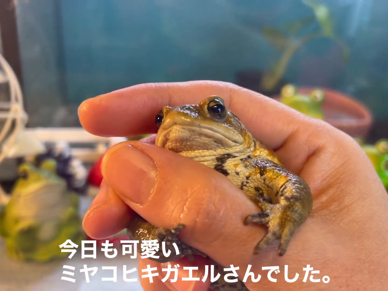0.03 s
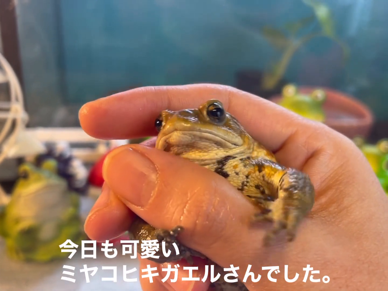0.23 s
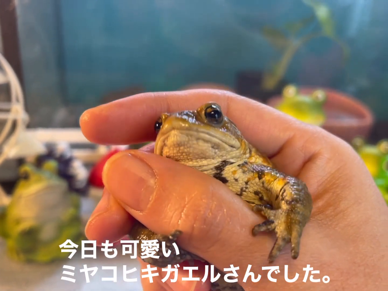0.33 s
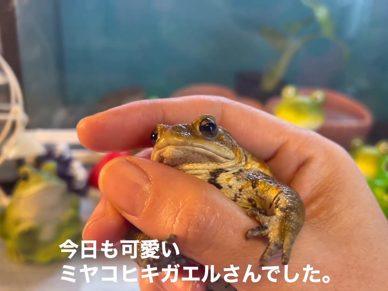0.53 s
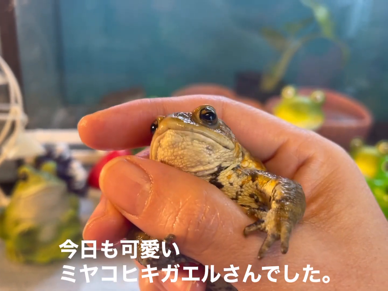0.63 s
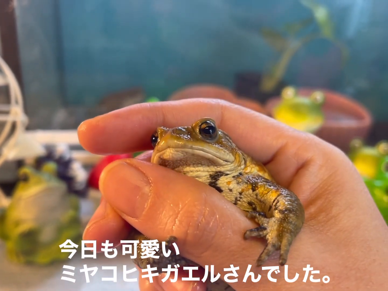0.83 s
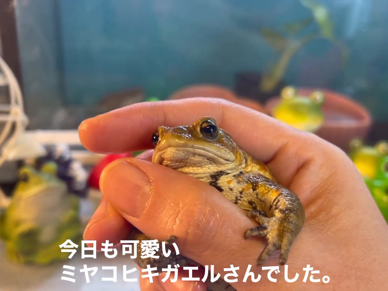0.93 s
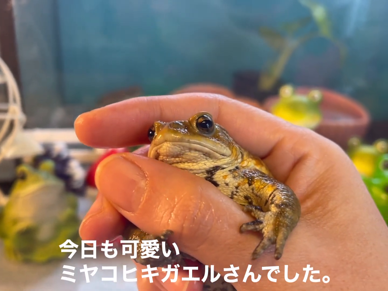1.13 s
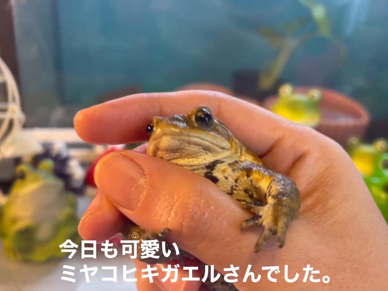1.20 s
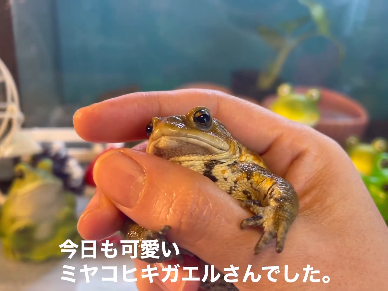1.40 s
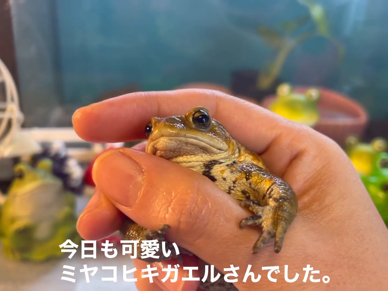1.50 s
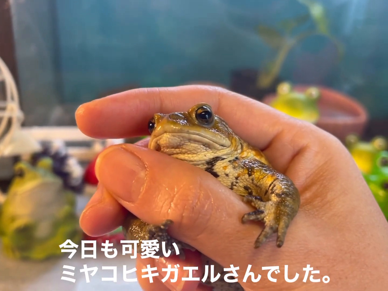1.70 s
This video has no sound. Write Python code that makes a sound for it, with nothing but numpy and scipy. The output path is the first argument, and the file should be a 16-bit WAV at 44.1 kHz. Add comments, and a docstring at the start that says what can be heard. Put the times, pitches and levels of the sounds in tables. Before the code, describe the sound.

Three brief, squeaky toad chirps, each falling in pitch, over faint room hum.

```python
"""A toad held in a hand gives three short release chirps, close up in a small room.
Room rumble, a low hum and a thin high whine run throughout; a soft hiss is gone by 0.5 s.
At 0.25, 0.58 and 1.2 s the larynx pops a few times, then locks into a falling tone,
raspy at first, pure at the end. Faint wet ticks come before and after the first chirp
and once after the last."""
import sys
import numpy as np
from scipy import signal
from scipy.fft import rfft, irfft, next_fast_len
from scipy.io import wavfile
from scipy.ndimage import map_coordinates

SR = 44100
rng = np.random.default_rng(int(sys.argv[2]) if len(sys.argv) > 2 else 0)


def digitize_waveform(pressure):
    """Quantize a signal to 16-bit integers and store it at the path in sys.argv[1].

    Rows of a 2-D input are taken as channels; values are limited to [-1, 1].
    """
    field = np.atleast_2d(pressure).T
    bounded = np.clip(field, -1, 1)
    quanta = np.round(bounded * 32767).astype(np.int16)
    wavfile.write(sys.argv[1], SR, quanta)


N = 77175


def amp(db):
    return 10 ** (np.asarray(db) / 20)


def unit(x):
    return x / np.sqrt(np.mean(x ** 2) + 1e-20)


def along(points, hz):
    """Interpolate (frequency [Hz], value) points on a log axis."""
    freqs, values = np.transpose(points)
    return np.interp(np.log(hz + 1), np.log(freqs + 1), values)


def ramp(u):
    """Smooth step, 0 to 1."""
    return np.sin(np.pi / 2 * np.clip(u, 0, 1)) ** 2


def wobble(rate_hz, t):
    """Smooth random curve, rate_hz knots a second."""
    return map_coordinates(rng.standard_normal(4096), [t * rate_hz], mode="wrap")


def filtered(x, response):
    """Apply the gain response(hz)."""
    size = next_fast_len(N + SR // 2)
    return irfft(rfft(x, size) * response(np.fft.rfftfreq(size, 1 / SR)), size)[..., :N]


def noise(colour):
    """Coloured noise, rms 1."""
    return unit(filtered(rng.standard_normal(N), lambda hz: amp(along(colour, hz))))


def placed(x, balance):
    """Pan by a left-right level difference per frequency."""
    return filtered(x, lambda hz: amp(np.outer([.5, -.5], along(balance, hz))))


def add(track, start_s, sound):
    part = track[round(start_s * SR):][:len(sound)]
    part += sound[:len(part)]


# calls (start [s], length [s], start pitch [Hz], level [dB], overtones [dB], rasp [dB],
# rasp hold [s], roughness [0-1])
CHIRPS = [(0.247, 0.043, 1310, -19, -13.5, -18.5, 0.012, 0.31),
          (0.583, 0.045, 1389, -21, -15, -17, 0.012, 0.63),
          (1.2077, 0.04, 1160, -24.5, -16, -19, 0.0098, .15)]
# throat shaping of the overtones (frequency [Hz], gain [dB])
THROAT_COLOUR = [(1800, 8.5), (2150, 0.5), (2450, 0.5), (3000, -0.5), (3300, -17.5), (3650, -6),
                 (4000, -34), (5500, -60)]
# noise between the overtones of rough calls (frequency [Hz], gain [dB])
GRIT_COLOUR = [(500, -24), (900, 3.5), (1600, -0.5), (2900, -2), (3700, -15), (4400, -18), (6500, -33.5)]
# bright rasp, also the snap of the pops (frequency [Hz], gain [dB])
RASP_COLOUR = [(2500, -23.5), (3900, -21), (4450, -7), (5000, -22), (5700, -9.5), (6600, -9), (7100, -18.5),
               (7800, -9), (8500, -16), (9700, -5), (11200, 8), (11900, -5), (12500, 0.5), (13300, -24.5)]
END_HZ, GLIDE_POWER = 966.6, 1.85
ATTACK_S, RELEASE_S, ROUGH_S = 0.0032, 0.0063, 0.016
FADE_DB, FADE_POWER, OVERTONE_FADE_DB, RASP_FALL_DB_PER_S = 12.5, 1.77, 23.5, 997.5
THROB_HZ, THROB_DEPTH = 365.4, 0.69
FLUTTER_HZ, FLUTTER_DB, JITTER = 1100, 1.2, .08
FLICKER_HZ, FLICKER_DB, GRIT_DB = 120, 3, -11


def chirps():
    """Larynx tone: pitch sags as the air runs out; overtones and rasp die before the fundamental."""
    out = np.zeros(N)
    harmonics = np.arange(2, 15)[:, None]
    for start_s, length_s, start_hz, db, overtone_db, rasp_db, hold_s, roughness in CHIRPS:
        t = np.arange(int(length_s * SR)) / SR
        progress = t / length_s
        unrest = roughness * np.exp(-(t / ROUGH_S) ** 2)
        pitch_hz = END_HZ + (start_hz - END_HZ) * (1 - progress) ** GLIDE_POWER
        jitter = 1 + JITTER * unrest * wobble(FLUTTER_HZ, t)
        phase = 2 * np.pi * np.cumsum(pitch_hz * jitter) / SR
        tone = amp(-FADE_DB * progress ** FADE_POWER) * np.sin(phase)

        partials = np.cos(harmonics * phase + rng.uniform(0, 2 * np.pi, harmonics.shape))
        flicker_db = FLICKER_DB * np.array([wobble(FLICKER_HZ, t) for _ in harmonics])
        throat_gain = amp(along(THROAT_COLOUR, harmonics * pitch_hz) + flicker_db)
        overtones = amp(overtone_db - OVERTONE_FADE_DB * progress) * (throat_gain * partials).sum(0)

        opening = 1 + .5 * np.cos(phase)
        grit = amp(GRIT_DB) * unrest * opening * noise(GRIT_COLOUR)[:len(t)]
        air = (.3 + roughness) * opening * noise(RASP_COLOUR)[:len(t)]
        buzz = (amp(along(RASP_COLOUR, harmonics * pitch_hz)) * partials).sum(0)
        fall_db = RASP_FALL_DB_PER_S * np.maximum(t - hold_s, 0)
        rasp = amp(rasp_db - fall_db + FLUTTER_DB * wobble(FLUTTER_HZ, t)) * (buzz + air)

        gate = ramp(t / ATTACK_S) * ramp((length_s - t) / RELEASE_S)
        # the beat of the pops lingers in the tone
        beat = np.cos(2 * np.pi * THROB_HZ * t + .5 * wobble(THROB_HZ, t))
        throb = 1 + THROB_DEPTH * unrest * beat
        add(out, start_s, amp(db) * gate * throb * (tone + overtones + grit + rasp))
    return out


# larynx openings (time [s], level [dB], brightness [dB], snap [dB])
POPS = [(0.2429, -18, 1, -32), (0.2434, -23, -10, -36), (.2462, -20.5, -6, -25), (0.2488, -12.5, -2.5, -27),
        (0.5775, -25, 0.5, -35), (0.5784, -17.5, -6, -29.5), (0.5809, -13.5, -2, -17),
        (0.5838, -22, 10, -16.5), (1.2051, -25, -3.5, -18), (1.2059, -22.5, -14, -17),
        (1.209, -20.5, -2, -19)]
# throat resonances (frequency [Hz], level [dB], T60 [s])
THROAT_MODES = [(907, -12.5, 0.0079), (1384, -7, 0.012), (1615, -6.5, .008), (2680, -14, 0.011)]
# treble tilt (frequency [Hz], share of brightness [0-1])
POP_TILT = [(1500, 0), (2600, 1)]
POP_ATTACK_S, POP_DETUNE, SNAP_T60_S = 0.00044, .02, 0.011
PUSH_DB, PUSH_S = -17.5, 0.00019


def pops():
    """As a chirp starts, each opening of the larynx rings the throat once."""
    out, t = np.zeros(N), np.arange(SR // 20) / SR
    for start_s, db, bright_db, snap_db in POPS:
        ring = np.zeros(len(t))
        for hz, mode_db, t60_s in THROAT_MODES:
            envelope = amp(mode_db + bright_db * along(POP_TILT, hz) - 60 * t / t60_s)
            ring += envelope * np.sin(2 * np.pi * hz * rng.normal(1, POP_DETUNE) * t)
        snap = amp(snap_db - 60 * t / SNAP_T60_S) * noise(RASP_COLOUR)[:len(t)]
        push = amp(PUSH_DB) * t / PUSH_S * np.exp(1 - t / PUSH_S)
        add(out, start_s, amp(db) * ramp(t / POP_ATTACK_S) * (push - ring + snap))
    return out


# wet ticks (time [s], level [dB])
TICKS = [(0.0993, -56.5), (0.3378, -38.5), (0.3375, -43.5), (.3487, -51), (1.393, -58)]
# tick spectrum (frequency [Hz], gain [dB])
TICK_COLOUR = [(1000, -23), (3500, -22), (5500, -9), (7500, -21), (9200, -1.5), (11000, 8.5), (12500, -23),
               (13500, -40)]
TICK_ATTACK_S, TICK_T60_S = 0.00071, .009


def ticks():
    """Wet skin or mouth: tiny bursts of bright noise."""
    out, t = np.zeros(N), np.arange(SR // 20) / SR
    for start_s, db in TICKS:
        envelope = amp(db - 60 * t / TICK_T60_S) * ramp(t / TICK_ATTACK_S)
        add(out, start_s, envelope * noise(TICK_COLOUR)[:len(t)])
    return out


# fingers scatter only short waves (frequency [Hz], gain [dB])
NEAR_COLOUR = [(1300, -14), (2500, -4), (4500, 12)]
# room decay (frequency [Hz], T60 [s])
ROOM_DECAY = [(200, 0.27), (1000, 0.14), (4000, 0.18), (11000, 0.14)]
NEAR_DB, NEAR_RISE_S, NEAR_T60_S = -6.5, 0.00049, 0.017
TAIL_DB, TAIL_RISE_S = -16, .003


def reflections(x):
    """Quick echoes off the hand and nearby things, then the short room tail."""
    hz, frame_s, spectrum = signal.stft(rng.standard_normal((2, SR // 2)), SR, nperseg=256)
    decay = amp(-60 * frame_s / along(ROOM_DECAY, hz)[:, None])
    tail = signal.istft(spectrum * decay, SR, nperseg=256)[1]
    t = np.arange(tail.shape[1]) / SR
    tail *= ramp(t / TAIL_RISE_S)
    tail += .5 * tail.mean(0)  # narrows the image
    near = noise(NEAR_COLOUR)[:len(t)] * amp(-60 * t / NEAR_T60_S) * ramp(t / NEAR_RISE_S)
    response = amp(TAIL_DB) * tail / np.linalg.norm(tail[0]) + amp(NEAR_DB) * near / np.linalg.norm(near)
    return signal.fftconvolve(x[None], response, axes=1)[:, :N]


# room noise spectrum (frequency [Hz], gain [dB])
RUMBLE_COLOUR = [(10, -58.5), (20, -33.5), (30, -11.5), (49, -1.5), (80, -14), (120, -9), (161, -17.5),
                 (195, -12), (290, -14.5), (400, -23), (650, -26), (900, -25.5), (1100, -28), (1800, -32),
                 (2850, -40), (3900, -54.5), (7000, -58), (9300, -52), (10800, -46.5), (11700, -58.5),
                 (13000, -76)]
# stereo likeness (frequency [Hz], correlation [-1 to 1])
RUMBLE_CORRELATION = [(60, 0.95), (150, 0.91), (360, 0.79), (880, -0.14), (2160, 0.17), (5280, .5),
                      (9000, 0.95)]
# room noise pan (frequency [Hz], left minus right [dB])
RUMBLE_BALANCE = [(60, 0.5), (360, 2.5), (880, 0.5), (2500, 6), (5280, 3.5), (8500, 0.5)]
RUMBLE_DB = -56


def rumble():
    """Steady room noise, narrow in the bass, wide in the midrange."""
    def mid_side_gain(hz):
        angle = np.arccos(np.clip(along(RUMBLE_CORRELATION, hz), -1, 1)) / 2
        return amp(along(RUMBLE_COLOUR, hz)) * [np.cos(angle), np.sin(angle)]

    mid, side = filtered(rng.standard_normal((2, N)), mid_side_gain)
    return amp(RUMBLE_DB) * unit(placed(np.array([mid + side, mid - side]), RUMBLE_BALANCE))


def wavering_sine(hz, waver_hz, t):
    """Sine whose pitch strays by about waver_hz."""
    return np.sin(2 * np.pi * np.cumsum(hz + waver_hz * wobble(4 * waver_hz, t)) / SR)


# hum lines (frequency [Hz], level [dB], waver [Hz])
HUM_TONES = [(64.1, -58.5, 1.926), (101.6, -68.5, 3.7), (200.6, -71, 2.4)]


def hum(t):
    """Three low, wavering tones."""
    return sum(amp(db) * unit(wavering_sine(hz, waver_hz, t)) for hz, db, waver_hz in HUM_TONES)


# whine lines (frequency [Hz], waver [Hz])
WHINE_TONES = [(9680, 45), (11220, 30)]
# per whine line (level [dB])
WHINE_LEVELS = [-84, -92]
WHINE_FLICKER_HZ, WHINE_FLICKER_DB = 60, 2


def whine(t):
    """Two thin, high tones that waver and flicker."""
    out = np.zeros(N)
    for (hz, waver_hz), db in zip(WHINE_TONES, WHINE_LEVELS):
        tone = wavering_sine(hz, waver_hz, t)
        flicker = amp(WHINE_FLICKER_DB * wobble(WHINE_FLICKER_HZ, t))
        out += amp(db) * unit(tone * flicker)
    return out


# hiss envelope (time [s], level [dB])
HISS_ENVELOPE = [(0, -67.5), (.085, -68.5), (.125, -65.5), (.23, -68), (.36, -79.5), (.5, -100)]
# hiss spectrum (frequency [Hz], gain [dB])
HISS_COLOUR = [(600, -1), (1500, 2), (3000, -4.5), (4000, -17), (5400, -13), (7000, -29), (12000, -24.5)]


def hiss(t):
    """Soft noise that dies away after the first chirp."""
    return amp(np.interp(t, *np.transpose(HISS_ENVELOPE))) * noise(HISS_COLOUR)


# toad and hiss pan (frequency [Hz], left minus right [dB])
TOAD_BALANCE = [(200, 5), (650, 6), (1190, 8.5), (2160, 7.5), (3300, 10.5), (4300, -0.5), (5600, 9),
                (7100, 0)]


def scene():
    """Toad and hiss a little to the left, over the room background."""
    t = np.arange(N) / SR
    toad = chirps() + pops() + ticks()
    toad_in_room = placed(toad + reflections(toad), TOAD_BALANCE)
    return toad_in_room + rumble() + hum(t) + whine(t) + placed(hiss(t), TOAD_BALANCE)


# phase between the microphones (frequency [Hz], left lead [rad])
MIC_PHASE = [(4600, 0), (5500, .7), (6300, 0), (7500, .4), (8900, 0), (10150, -3.14), (11750, -6.28),
             (12200, -6.4), (12800, -7.5)]
CUTOFF_HZ = 13100


def record(dry):
    """Two microphones part in phase in the treble; a steep low-pass limits the band."""
    def response(hz):
        phase_shift = np.exp(1j * np.outer([1, 0], along(MIC_PHASE, hz)))
        return phase_shift / (1 + (hz / CUTOFF_HZ) ** 120)

    return filtered(dry, response)


dry = scene()
out = record(dry)
digitize_waveform(out)
```